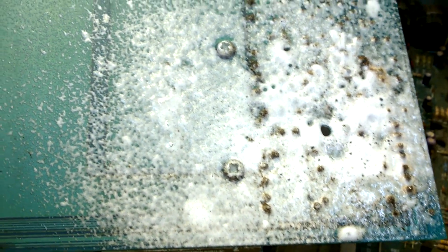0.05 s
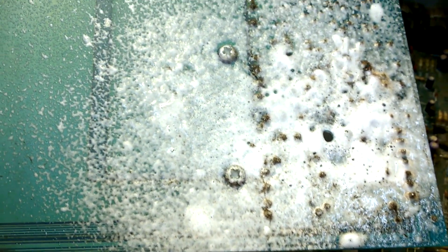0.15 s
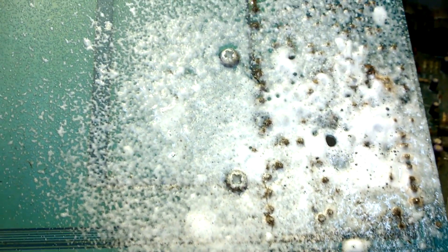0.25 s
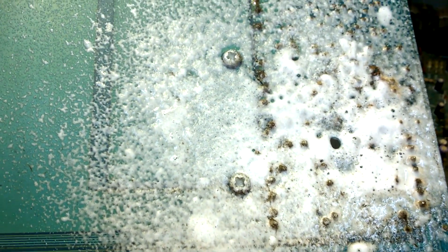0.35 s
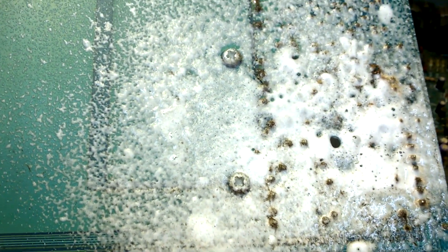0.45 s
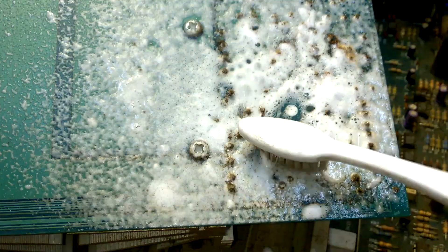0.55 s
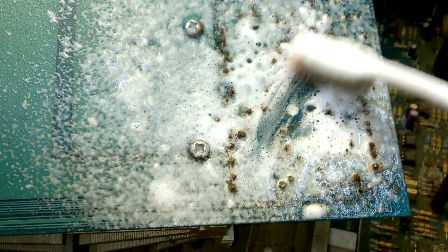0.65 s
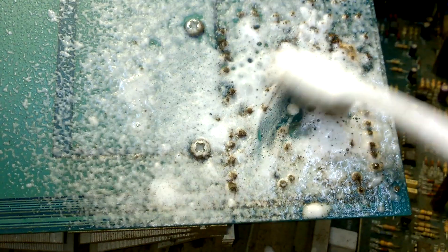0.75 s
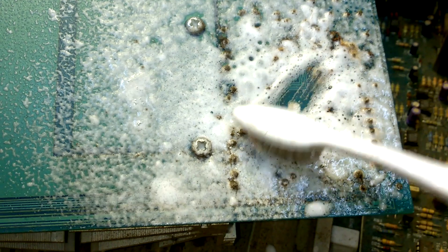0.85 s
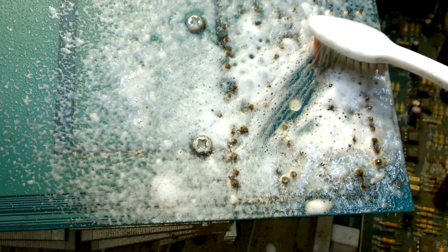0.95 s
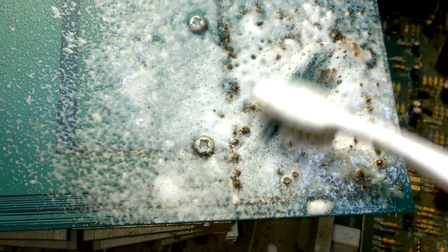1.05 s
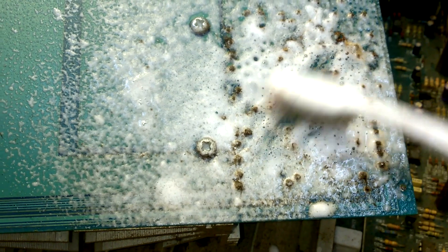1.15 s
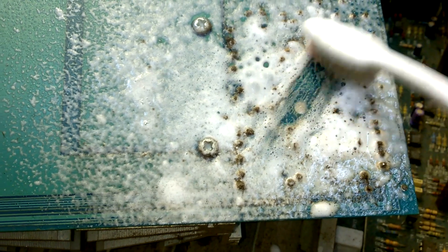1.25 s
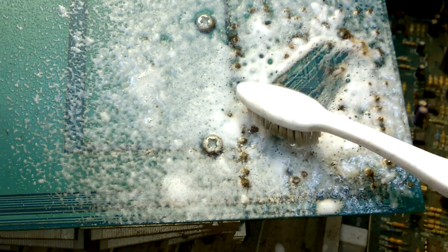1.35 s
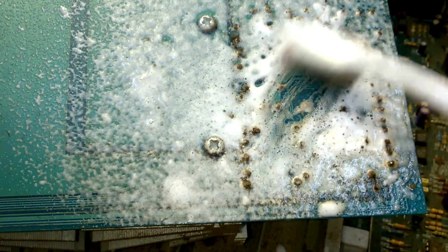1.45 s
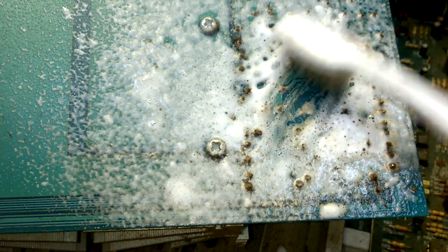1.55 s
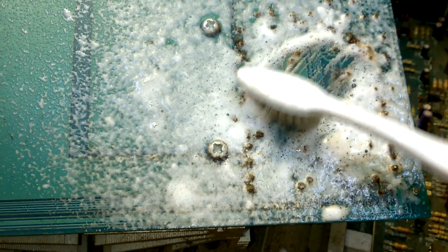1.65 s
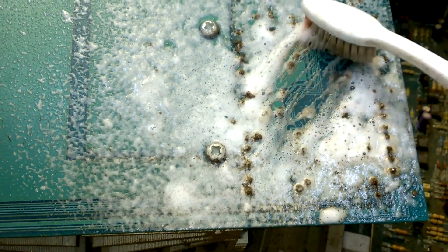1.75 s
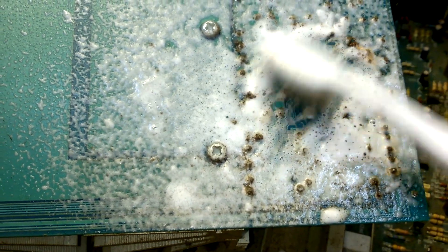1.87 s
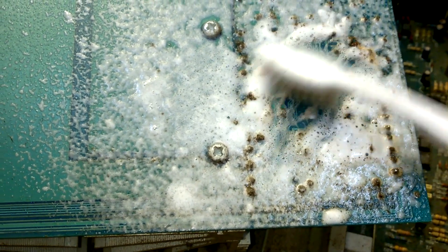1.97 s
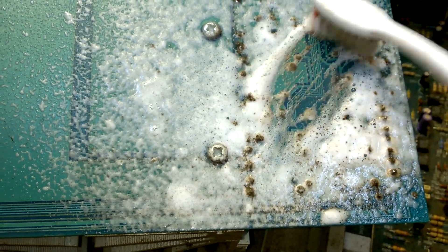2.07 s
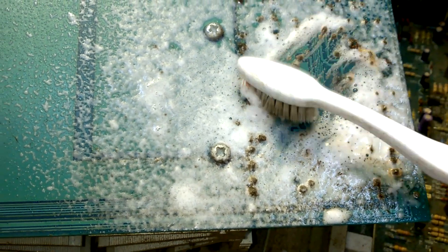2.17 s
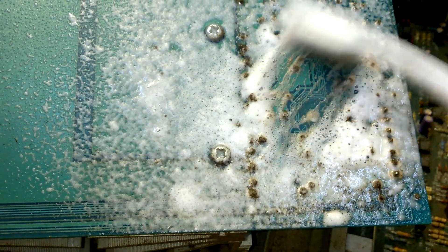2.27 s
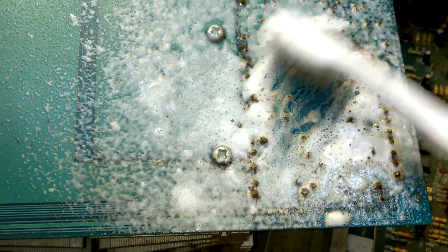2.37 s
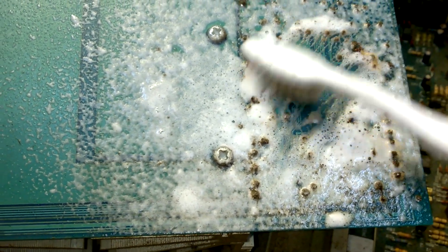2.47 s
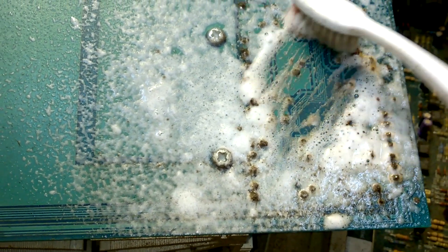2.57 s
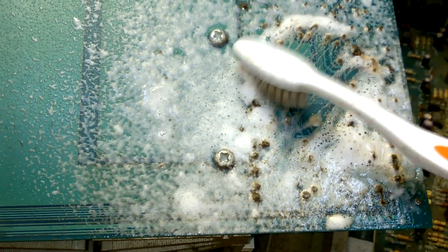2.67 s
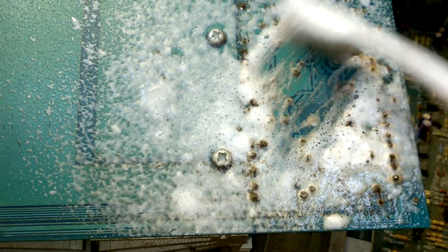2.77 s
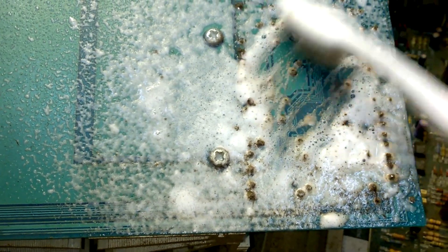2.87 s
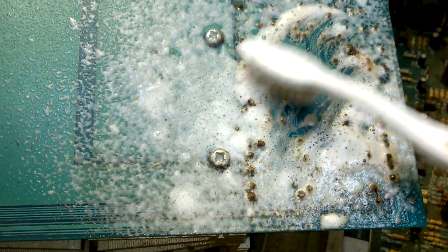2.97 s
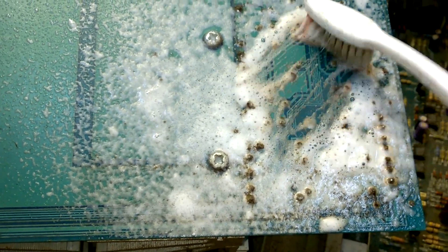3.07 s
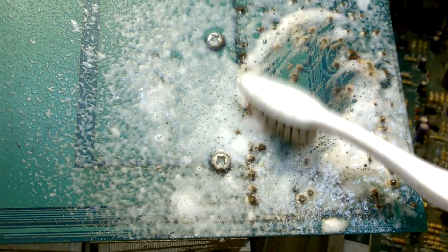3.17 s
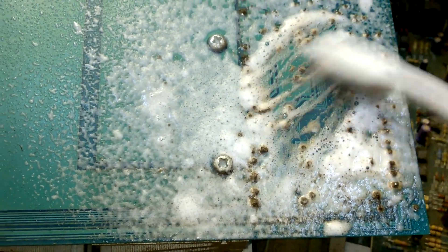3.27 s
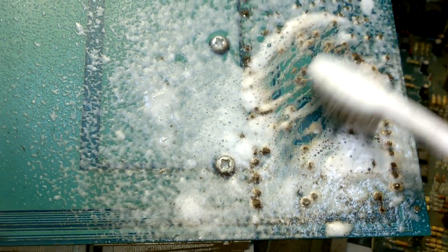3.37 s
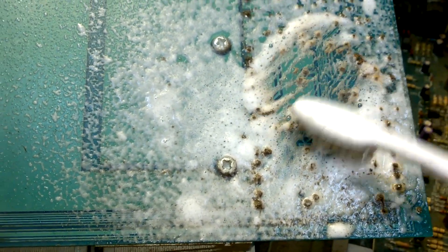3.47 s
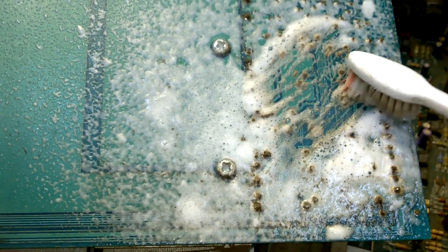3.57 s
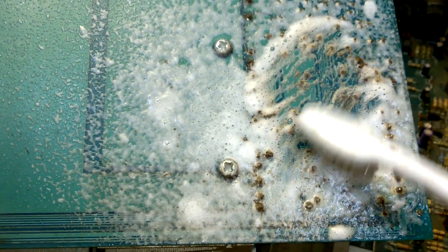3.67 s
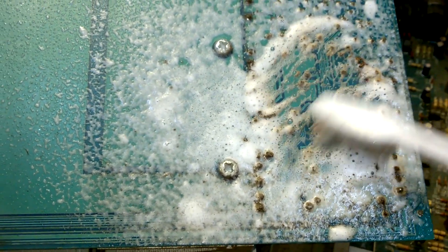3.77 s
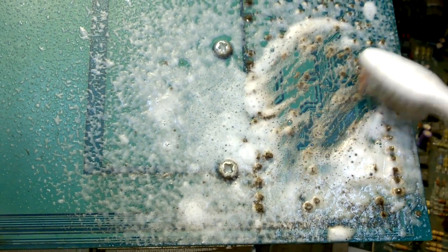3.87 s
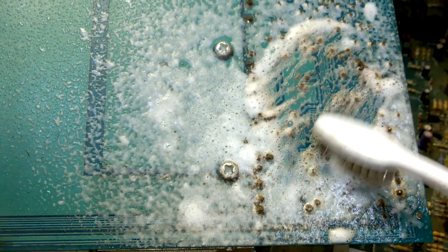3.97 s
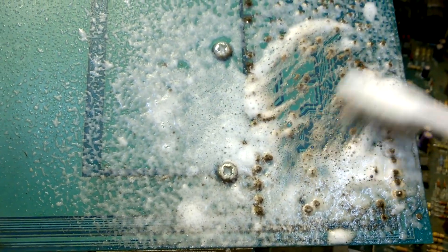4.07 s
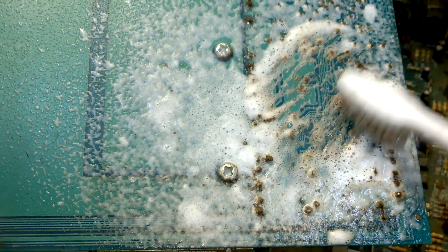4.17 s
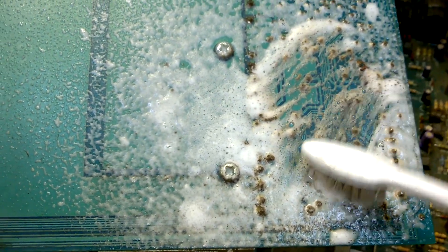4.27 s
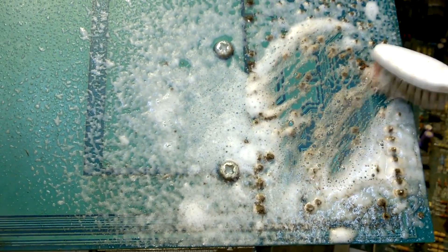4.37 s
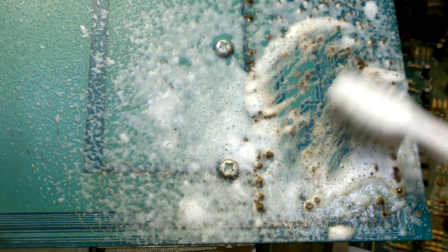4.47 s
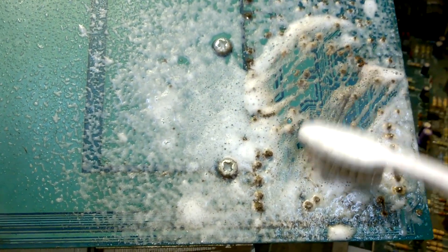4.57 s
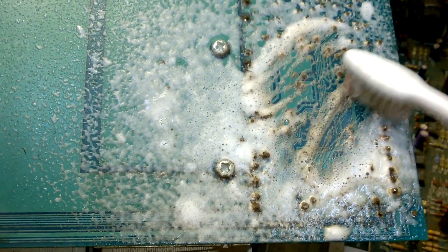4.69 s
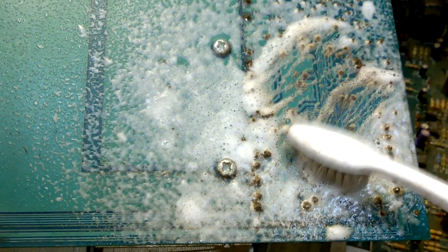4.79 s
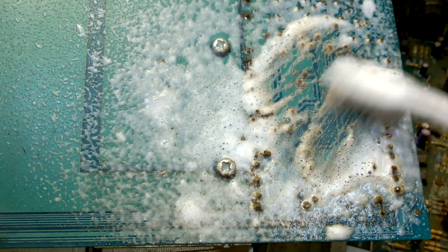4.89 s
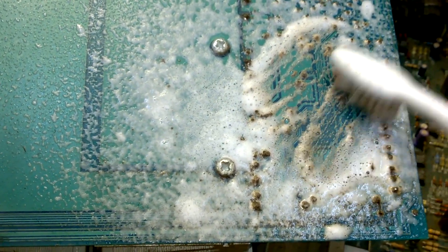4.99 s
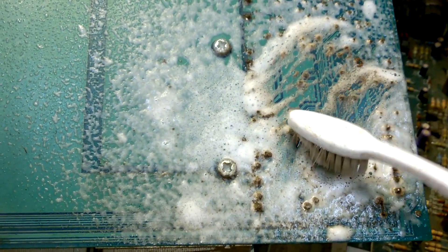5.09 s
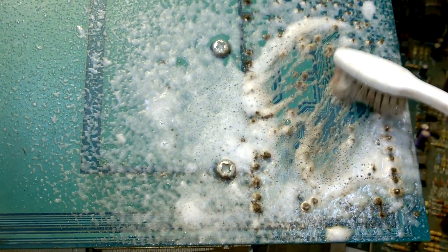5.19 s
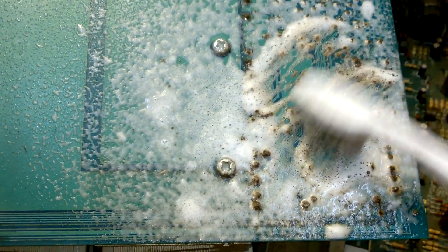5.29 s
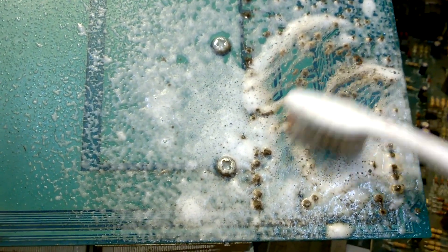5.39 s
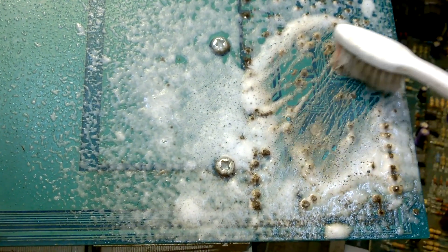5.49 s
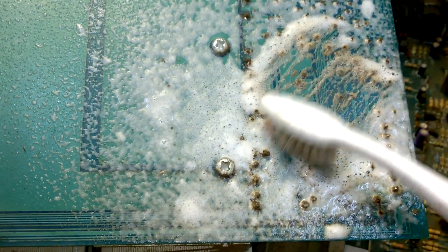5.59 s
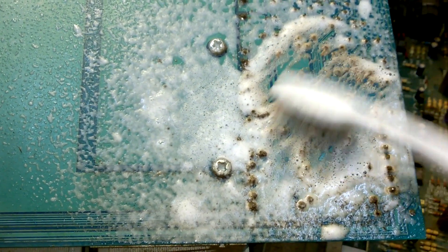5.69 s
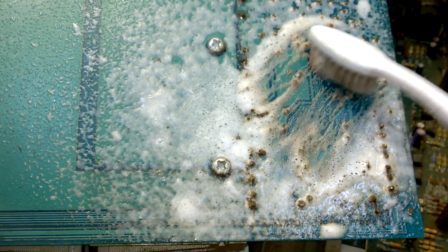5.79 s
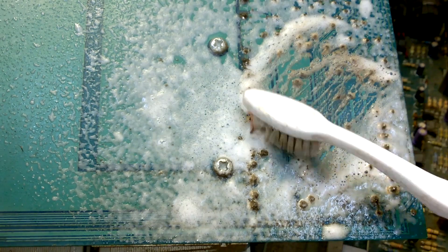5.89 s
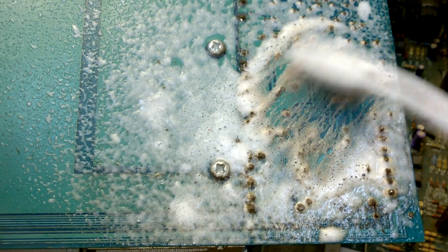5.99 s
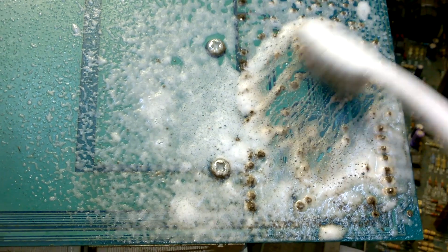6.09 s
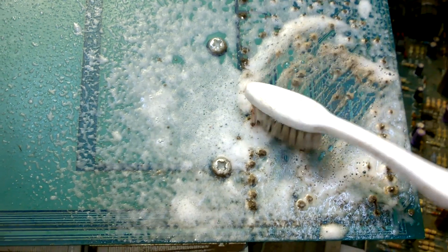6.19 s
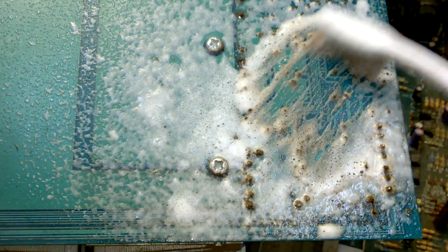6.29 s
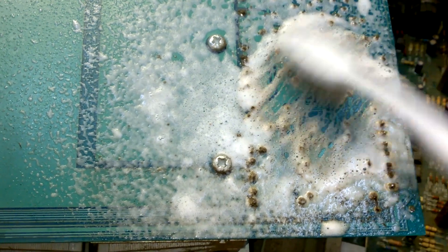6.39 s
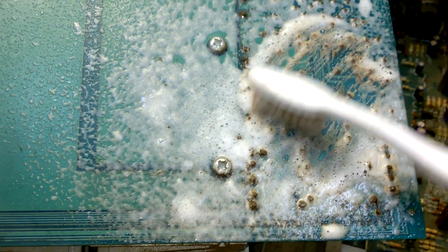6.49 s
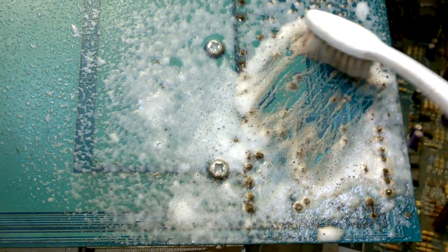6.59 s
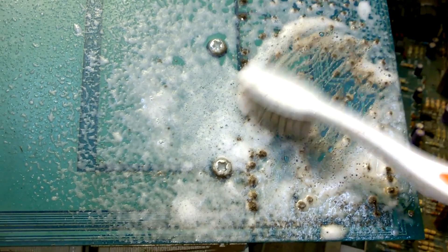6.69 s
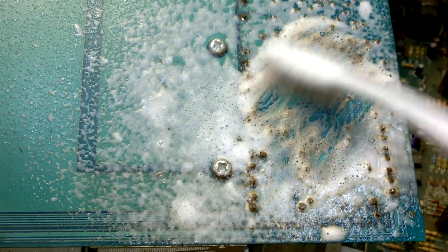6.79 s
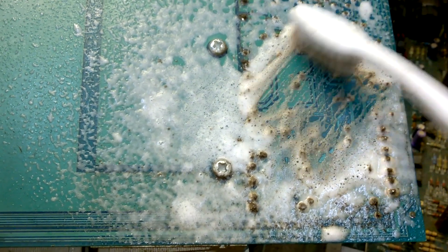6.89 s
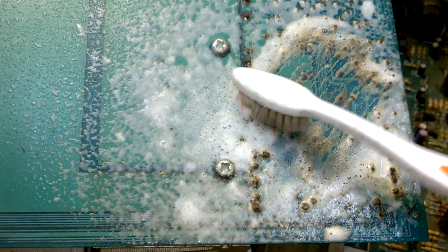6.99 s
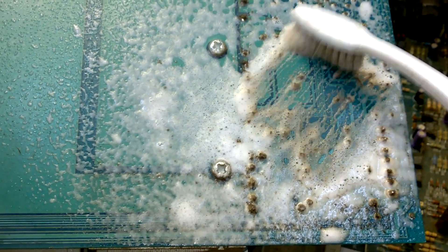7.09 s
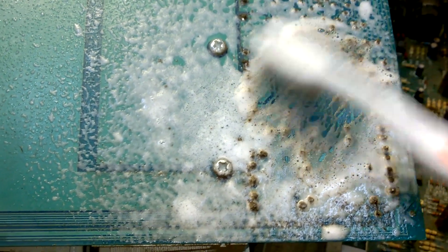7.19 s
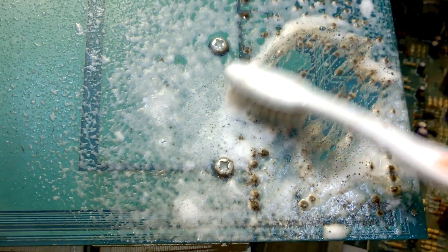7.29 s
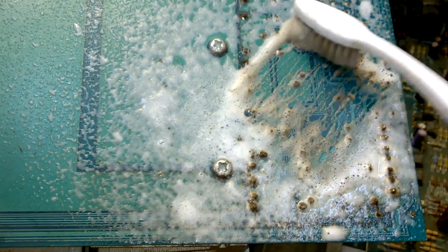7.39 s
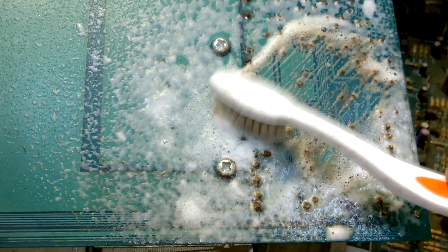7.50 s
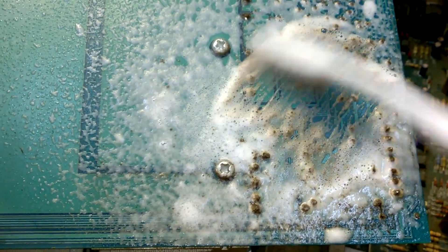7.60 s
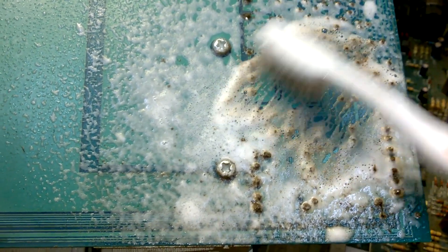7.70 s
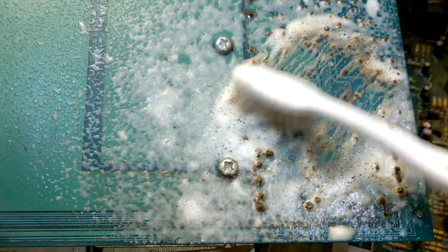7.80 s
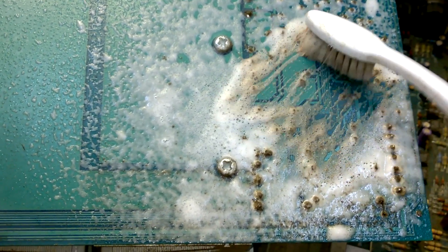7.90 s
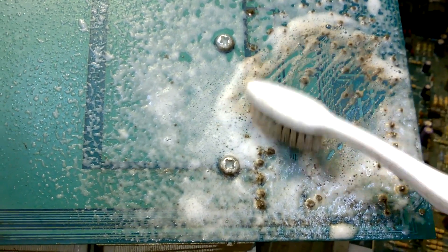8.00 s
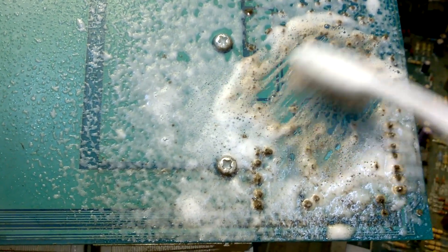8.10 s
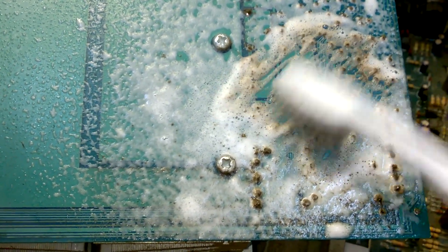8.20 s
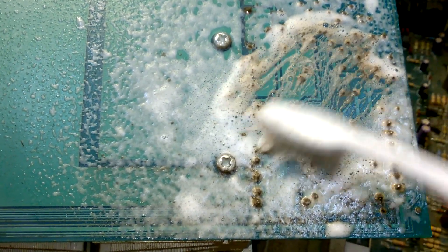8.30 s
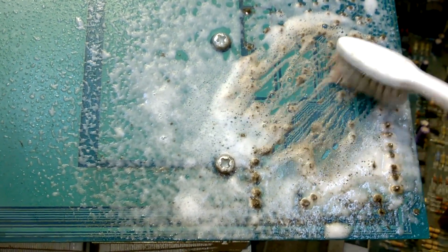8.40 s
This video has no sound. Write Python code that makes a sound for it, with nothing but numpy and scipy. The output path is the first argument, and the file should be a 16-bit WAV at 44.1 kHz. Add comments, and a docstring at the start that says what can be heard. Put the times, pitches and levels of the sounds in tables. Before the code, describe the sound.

A knock on a workbench, then a toothbrush scrubs a wet, foamy circuit board in quick, scratchy back-and-forth strokes.

```python
"""A faint tick, then a knock shakes a workbench, and a toothbrush scrubs a wet, foamy circuit board on it.
Stick-slip friction of the bristles makes dense clicks that drive the resonances of brush head and board.
Foam fizzes as its bubbles burst, tufts snap off solder pins, and now and then the board bumps the bench,
exciting its damped modes. A close pair of microphones hears it all in a quiet room."""
import sys
import numpy as np
from scipy import signal
from scipy.fft import rfft, irfft, next_fast_len
from scipy.io import wavfile
from scipy.ndimage import uniform_filter1d

SR = 44100
rng = np.random.default_rng(int(sys.argv[2]) if len(sys.argv) > 2 else 0)


def bounce(signal):
    """Save signal as a 16-bit WAV file at the path given by the first command-line argument."""
    frames = np.transpose(np.atleast_2d(signal))
    limited = np.clip(frames, -1, 1)
    pcm = np.round(limited * 32767).astype(np.int16)
    wavfile.write(sys.argv[1], SR, pcm)


N = 372644

# Strokes, pull and push in turn: (bite t/s, bearing down t/s, bite level/dB, lift level/dB,
# level at the turn before/dB, rise to the bite/(dB/s), extra ring of the head/dB)
BRUSH_STROKES = [(0.515, 0.03, -35, -40.5, -61.5, 3002, -1), (0.634, 0.041, -31.5, -39, -70, 800, 3),
                 (0.774, 0.064, -32.1, -37.5, -57, 448, 0.5), (0.907, 0.042, -34, -34, -61, 800, 1),
                 (1.045, 0.057, -28.5, -39.5, -49, 450, 3.5), (1.168, 0.046, -28.5, -35.5, -57, 800, 1.5),
                 (1.297, 0.056, -32, -34.5, -57.1, 600, -0.5), (1.443, 0.039, -32, -35, -64, 797, 1.5),
                 (1.578, 0.035, -29.5, -35, -54, 452, -0.5), (1.704, 0.041, -32.5, -31.5, -52, 600, 1),
                 (1.83, 0.054, -33.5, -29.5, -68, 800, 1.5), (1.969, 0.04, -35.2, -29, -51.9, 450, 1.5),
                 (2.09, 0.063, -30.5, -33.5, -57.0, 1111, -0.5),
                 (2.24, 0.028, -34.5, -30.5, -58, 450, -0.5), (2.345, 0.053, -31, -30, -57.3, 1103, 2.5),
                 (2.479, 0.048, -36.3, -33.5, -60, 450, 0.5), (2.619, 0.05, -26.5, -37.5, -57, 605, -1),
                 (2.739, 0.041, -36.5, -29.5, -51, 600, -1), (2.853, 0.057, -28, -31, -61, 798, 1.5),
                 (2.985, 0.039, -34.5, -30.5, -45, 450, 0), (3.101, 0.061, -28.5, -30, -58, 3200, 4),
                 (3.227, 0.058, -33.5, -35, -43.2, 1100, -0.5), (3.347, 0.066, -33, -31.5, -60, 2200, 1),
                 (3.495, 0.047, -31.5, -35.5, -41, 450, 3.5), (3.626, 0.066, -29.5, -33.5, -76, 1500, 1),
                 (3.767, 0.042, -32.0, -35.5, -48.5, 600, 2.5), (3.879, 0.094, -36, -33.5, -68, 1100, 1.5),
                 (4.049, 0.028, -35.2, -33, -49, 450, 2), (4.164, 0.067, -34.2, -30, -70, 800, 1),
                 (4.31, 0.046, -31.5, -34.8, -52.0, 600, 2.5), (4.439, 0.075, -31.5, -31.5, -65, 600, 1),
                 (4.593, 0.046, -31.5, -35.5, -46, 602, 1), (4.716, 0.075, -34, -28.5, -68, 799, 2),
                 (4.874, 0.038, -31.5, -30.5, -53, 600, 1.5), (5.019, 0.064, -29, -32.5, -67, 454, -1.5),
                 (5.155, 0.037, -32.5, -35, -46, 452, 1.5), (5.281, 0.051, -29.5, -31.2, -62, 600, 0.5),
                 (5.407, 0.046, -36.5, -31.8, -51, 800, 1.5), (5.56, 0.069, -27, -38.5, -51, 450, -1),
                 (5.702, 0.045, -32.5, -35.5, -46, 450, 0), (5.832, 0.045, -29.5, -30, -54.3, 600, -0.5),
                 (5.971, 0.045, -31.5, -34, -44, 809, 1), (6.108, 0.055, -28.5, -30, -67, 800, -0.5),
                 (6.243, 0.056, -34, -31, -47, 450, -1), (6.382, 0.061, -26.5, -32, -67, 800, 0),
                 (6.528, 0.037, -30, -33.5, -48, 600, -0.5), (6.641, 0.053, -29.2, -27.5, -63, 799, 1.5),
                 (6.791, 0.043, -32, -34, -53.4, 600, 0), (6.907, 0.053, -30.5, -29.5, -60, 800, 0.5),
                 (7.062, 0.029, -30.5, -30, -51, 452, 1), (7.185, 0.068, -26.5, -37.5, -62, 602, 0.5),
                 (7.312, 0.05, -34, -30.5, -53, 803, -0.5), (7.436, 0.061, -26, -32, -56.6, 1098, 1.5),
                 (7.562, 0.052, -35, -34.7, -46.5, 800, -3.5), (7.689, 0.054, -30, -32.5, -66, 1102, 2),
                 (7.809, 0.052, -36.5, -28.5, -42.5, 450, 0), (7.918, 0.057, -32, -27, -55, 3200, 2.5),
                 (8.064, 0.04, -33, -28.5, -41, 2204, 0), (8.188, 0.067, -27.5, -34, -60, 800, 0),
                 (8.304, 0.056, -36, -27.5, -50, 600, -1), (8.424, 0.032, -36, -27.5, -54.0, 1100, -2)]
# Timbre of a pull as the brush wanders: (t/s, board/dB, scrape/dB, foam/dB, upper board modes/dB)
PULL_TIMBRE = [(0.55, -8.5, -0.5, 13, 2), (1.05, -9, 0, 11, 1), (1.4, -12.5, -2, 4, 1.5),
               (1.7, -12, -6.5, 0, 0.5), (2.3, -10.5, -4, 1, 0), (3.0, -10.5, -6.5, -1, 1),
               (3.3, -6.5, -1, 5.5, 0), (3.9, -9, 1, 3.5, 2), (4.9, -12.5, 1.5, 2.5, 4.5),
               (5.5, -9.5, 0.5, 3.5, 1), (6.102, -10, -2, -1, 0), (6.9, -13, -0.5, 0.5, 2.5),
               (7.6, -13.5, -1.5, 0, 2.5), (8.3, -7, 0.5, 2, -0.5)]
# Tufts snapping off solder pins: (t/s, level/dB, crack relative to that level/dB)
TUFT_SNAPS = [(2.341, -26, -16), (7.915, -23, -21), (1.8639, -14, -4), (2.5214, -29, -9), (2.7624, -25, -5),
              (3.098, -35, -21), (3.1041, -13.5, -16), (3.106, -21, -13), (3.1185, -23, -15),
              (3.245, -21, -7), (3.3446, -20, -24), (3.349, -15.5, -21), (3.4407, -38, 4),
              (3.5388, -17.5, -21), (3.624, -34, -15), (3.6264, -27, -4), (3.6985, -28, -4),
              (4.0595, -23, -9), (4.4384, -35, -10), (4.878, -24, -10), (5.446, -23, -7), (5.627, -22, -12),
              (5.9711, -9.5, -8.5), (5.9844, -14, -8.5), (5.9918, -18, -2), (6.271, -15, -5),
              (6.51, -23, -5), (6.5292, -16, -15.5), (6.5636, -32, -18), (6.8055, -14, -7),
              (7.3731, -25, -14), (7.5522, -28, -14), (7.5619, -18.5, -14), (7.567, -22, -4),
              (7.8071, -35, -11), (7.8514, -21, -1), (8.064, -19, -17), (8.171, -21.5, -13.5),
              (8.2052, -19, -1)]
# Blows on the bench: (t/s, thud level/dB, clack level/dB, contact t/ms)
BLOWS = [(0.243, 3.5, -21.5, 1.26), (0.247, -10, -16, 0.72), (0.254, -13, -22.5, 0.75),
         (0.262, 4, -19.5, 1.37), (0.276, -12, -20.5, 1.8), (0.454, -17, -70, 2.6),
         (0.47, -11.5, -51, 1.37), (0.478, -15.5, -49, 1.63), (0.486, -27, -46, 1.8),
         (1.316, -34, -44, 3.4), (1.599, -40, -41, 1.5), (2.146, -26.5, -25, 1.7), (2.378, -30, -24, 1.9),
         (3.123, -33, -25, 1.7), (3.358, -35.5, -27.5, 1.2), (3.896, -26, -45, 3.1),
         (4.441, -33.5, -42, 1.1), (4.992, -38, -38, 1.6), (5.281, -41, -52, 1.8), (6.415, -18, -30, 4.5),
         (7.983, -31, -22.5, 1.1), (8.211, -37, -37, 1)]
# Modes of the bench: (f/Hz, level/dB, 60 dB decay t/s)
BENCH_MODES = [(72, -12, 0.49), (100.3, -10, 0.14), (123, -16, 0.51), (160, -26, 0.34), (172, -28, 0.21),
               (228, -2, 0.18), (261, -11.5, 0.12), (294, 0.5, 0.062), (378, -4, 0.063), (401, -12, 0.11),
               (558, -5.5, 0.1), (639, -10, 0.077), (685, -8.5, 0.07), (754, -9.5, 0.069), (808, -10, 0.16),
               (884, -13, 0.22), (984, -6, 0.035), (1120, -6, 0.04), (1330, -18, 0.049)]
# Resonances of board, scrape, brush head, snapped pin and clack: (f/Hz, bandwidth/Hz, level/dB)
BOARD_MODES = [(80, 22, -10), (129.1, 9.9, -4.5), (254.3, 3.9, -7), (313.3, 7.5, -10), (432.3, 11.5, 1.5),
               (482, 23, -4.5), (518.1, 9.6, 4.5), (583, 50, -5.5), (731.4, 14.8, -10), (891, 37, -8),
               (965, 7.2, -6.5), (1011.5, 8.4, -0.5), (1076, 14.5, -6), (1168, 36, -6.5),
               (1264, 13.5, -7.5), (1328, 89, -9.5)]
SCRAPE_MODES = [(1649, 74, -4.5), (1767, 23, 0), (1920, 118, -3.5), (2105, 152, -1), (2614, 383, 1.5),
                (3065, 420, 2.5), (3675, 315, 0)]
HEAD_MODES = [(3861, 99, -1), (4060, 208, 4), (4443, 910, -4)]
PIN_MODES = [(2650, 650, -3), (4000, 600, 0)]
CLACK_MODES = [(1700, 250, 2.5), (1250, 630, 0.5), (4800, 5300, -12.5)]
# Spectral densities of the fizz and of the background: (f/Hz, relative level/dB)
FOAM_SPECTRUM = [(2000, -20.5), (4300, -20), (5000, -4), (5800, 0), (7000, -3), (7700, -6), (9000, -6.5),
                 (10500, -9), (12300, -7), (14000, -7), (15000, -5.5), (16000, -11)]
AIR_SPECTRUM = [(15, -28), (25, -2), (70, 1), (326, -25), (863, -28.5), (1520, -31), (1840, -28.5),
                (4740, -33), (5280, -32.5), (16000, -43)]

PUSH_DB = (-7.5, 2.3, -1.5, 4)  # a push changes board, scrape, foam and upper board modes
PUSH_THINS_DB = -1.5  # a push drives the deepest scrape resonances less
FALL_DB_PER_S = (679, 806)  # lift of a pull, of a push
CUT_S, CUT_DB_PER_S = 0.511, 900  # the knock's ring cuts off abruptly just before the scrubbing starts
EARLY_CLACK_DB = -9.5  # the first clack resonance is weaker before the scrubbing
TIME = np.arange(N) / SR


def brush(clack):
    """Stick-slip friction: bristle slips follow the stroke, drive head and board, and stir the foam."""
    stroke_db, head_db, push = strokes()
    times, *timbre = np.transpose(PULL_TIMBRE)
    board_db, scrape_db, foam_db, upper_db = (
        np.interp(TIME, times, db) + change_db * push for db, change_db in zip(timbre, PUSH_DB))
    # head, scrape and foam share the stroke level, adding in power
    total = np.sqrt(undb(head_db) ** 2 + undb(scrape_db) ** 2 + undb(foam_db) ** 2)
    envelope = undb(stroke_db + 1.52 * flicker(120)) / total
    slips, bubbles = clicks(9000, spread_db=1.1), clicks(9000, spread_db=2.9)
    head = level(resonate(pair(slips, 0.7, 2.94), HEAD_MODES), 0.056) * undb(head_db)
    wet_slips = pair(slips + 0.78 * bubbles, 0.84, 2.1)
    scrape = resonate_split(wet_slips, SCRAPE_MODES, PUSH_THINS_DB * push, 0, count=4)
    scrape = level(scrape, 1.48) * undb(scrape_db)
    fizz = colour(pair(0.96 * slips + bubbles, 0.21, -2.0), FOAM_SPECTRUM)
    foam = level(fizz, 2.4) * undb(foam_db)
    # slips and clacks force the board, which rings on after each lift
    drive = pair(slips, 0.86, 2.9) * undb(stroke_db + board_db + 21.0 + 2.4 * flicker(40))
    board = resonate_split(drive + undb(16) * clack, BOARD_MODES, 0, upper_db, count=8)
    return envelope * (head + scrape + foam) + board


def strokes():
    """Amplitude envelope of bite, bearing down and lift: level/dB, head ring/dB, and 1 during a push."""
    bite, hold, bite_db, lift_db, turn_db, rise, head_db = np.transpose(BRUSH_STROKES)[:, :, None]
    t = np.arange(N // 40 + 2) * 40 / SR
    fall = np.resize(FALL_DB_PER_S, len(BRUSH_STROKES))[:, None]
    bearing_db = bite_db + (lift_db - bite_db) * np.clip((t - bite) / hold, 0, 1)
    each_db = bearing_db - rise * np.maximum(bite - t, 0) - fall * np.maximum(t - bite - hold, 0)
    # the bristles never quite leave the board where the brush turns
    turns = (bite[1:, 0] + (bite + hold)[:-1, 0]) / 2
    db = np.maximum(each_db.max(axis=0), np.interp(t, turns, turn_db[1:, 0]))
    db[t < bite[0]] = -120
    stroke = np.searchsorted(turns, TIME)
    ring_db, push = uniform_filter1d([head_db[stroke, 0], stroke % 2], SR // 50)
    return np.interp(TIME, t, db), ring_db, push


def snaps():
    """Impulse excitation: a tuft's sudden release rings pin and head and cracks in the treble."""
    ring, crack = np.zeros((2, N))
    for start, db, treble_db in TUFT_SNAPS:
        ring[int(start * SR)] += undb(db)
        crack[int(start * SR)] += undb(db + treble_db)
    snap = undb(22) * resonate(ring, PIN_MODES) + undb(10) * resonate(crack, [(12900, 15000, 0)])
    return room(snap, wet_db=-4.5, t60=0.0084)


def bench_thuds():
    """Modal superposition: blows ring the bench, duller for a longer contact; loose things rattle on."""
    force = np.zeros((2, N + SR))  # rows: blows before and after CUT_S
    t = np.arange(SR) / SR
    noise = rng.standard_normal((len(BLOWS), SR // 2))
    for (start, db, _, contact_ms), rattle in zip(BLOWS, noise):
        i, row = int(start * SR), int(start > CUT_S)
        phase = t[:SR // 100] * 1000 / contact_ms
        pulse = (phase < 1) * np.sin(np.pi * phase) ** 2 / np.sum(phase < .5)
        force[row, i:i + SR // 100] += undb(db) * pulse
        force[row, i:i + SR // 2] += undb(db - 38.5) * uniform_filter1d(rattle, 50) * fade(0.37, .5)
    ring = sum((-1) ** k * undb(db) * np.sin(2 * np.pi * hz * t) * fade(t60, 1)
               for k, (hz, db, t60) in enumerate(BENCH_MODES))
    knock, bumps = signal.oaconvolve(force, ring[None], axes=1)[:, :N]
    cut = undb(-CUT_DB_PER_S * np.maximum(TIME - CUT_S, 0))
    return undb(-10) * room(knock * cut + bumps, wet_db=-15, t60=0.02)


def clack_bursts():
    """Impact noise: at each blow the board claps on the bench in a burst of grit."""
    bursts, noise = np.zeros(N + SR), rng.standard_normal((len(BLOWS), SR // 4))
    for (start, _, db, _), grit in zip(BLOWS, noise):
        i = int(start * SR)
        bursts[i:i + SR // 4] += undb(db) * grit * fade(0.037, .25)
    return bursts[:N]


def clack_ring(clack):
    """Forced vibration: the board's claps drive broad resonances that echo in the room."""
    first_db = EARLY_CLACK_DB * (TIME < CUT_S)
    ring = resonate_split(clack, CLACK_MODES, first_db, 0, count=1)
    return room(undb(6.5) * ring, wet_db=0.5, t60=0.18)


def foam_pops():
    """A Poisson process: once the brush has stirred the foam, scattered bubbles burst."""
    bursts = pair(clicks(150, spread_db=10.5), 0.26, -1.0) * (TIME > BRUSH_STROKES[0][0])
    return level(resonate(bursts, [(4040, 6700, 12), (11000, 8300, -14)]), -66.5)


def tick(start_s=0.095):
    """Band-limited noise in exponential decay: a faint tick that dies away as a high hiss."""
    burst, i = np.zeros((2, N)), int(start_s * SR)
    burst[:, i:i + SR // 5] = undb(-41.5) * rng.standard_normal((2, SR // 5)) * fade(0.18, .2)
    return resonate(burst, [(5870, 1140, 3.5), (3500, 1800, -3)])


def air():
    """Stationary noise: room rumble and microphone hiss, most alike left and right in the bass."""
    mid, side = colour(rng.standard_normal((2, N)), AIR_SPECTRUM)
    side = colour(side, [(200, -5.0), (900, 3.5)])
    return level(np.array([mid + side, mid - side]), -57.5)


def room(x, wet_db, t60):
    """Reverberation: direct sound plus decaying echoes that differ at each microphone."""
    echo = rng.standard_normal((2, SR // 5)) * fade(t60, .2)
    echo *= undb(wet_db) / np.sqrt(np.sum(echo ** 2, axis=1, keepdims=True))
    return x + signal.oaconvolve(x * np.ones((2, 1)), echo, axes=1)[:, :N]


def pair(x, alike, pan_db):
    """Partial coherence: two microphones share a fraction of a wide source's power."""
    return (np.sqrt(alike) * x[0] + np.sqrt(1 - alike) * x[1:]) * undb([[pan_db / 2], [-pan_db / 2]])


def clicks(per_s, spread_db):
    """Shot noise: random impulses of uneven size; rows: shared, left only, right only."""
    size = undb(spread_db * np.minimum(rng.exponential(size=N), 4))
    return level((rng.random(N) < per_s / SR) * size * rng.standard_normal((3, N)), 0)


def flicker(per_s):
    """Random modulation: values joined by straight ramps, with a spread near 1."""
    step = int(SR / per_s)
    held = np.repeat(rng.standard_normal(N // step + 1), step)
    return 1.09 * uniform_filter1d(held, step)[:N]


def resonate(x, modes):
    """Resonance: second-order band-passes summed with alternating sign."""
    return through(x, lambda f: sum((-1) ** k * undb(db) / (1 + 1j * (f - hz * hz / f) / width)
                                    for k, (hz, width, db) in enumerate(modes)))


def resonate_split(x, modes, first_db, rest_db, count):
    """Superposition: the first count modes and the rest are driven with separate strengths."""
    return resonate(x * undb(first_db), modes[:count]) + resonate(x * undb(rest_db), modes[count:])


def colour(x, points):
    """Spectral shaping by (f/Hz, level/dB) points joined over log frequency."""
    hz, db = np.transpose(points)
    return through(x, lambda f: undb(np.interp(np.log(f), np.log(hz), db)))


def through(x, response):
    """Linear filtering: the spectrum is multiplied by a frequency response."""
    size = next_fast_len(N + SR // 4)
    hz = np.fft.rfftfreq(size, 1 / SR) + 1
    return irfft(rfft(x, size) * response(hz), size)[..., :N]


def fade(t60, length_s):
    """Exponential decay of 60 dB in t60 seconds."""
    return undb(-60 * np.arange(int(length_s * SR)) / SR / t60)


def level(x, db):
    """Normalisation to an rms level."""
    return x * undb(db) / np.sqrt(np.mean(x ** 2))


def undb(db):
    """Amplitude ratio of a level in decibels."""
    return 10 ** (np.asarray(db) / 20)


def scene():
    """Superposition of all sources at the two microphones."""
    clack = clack_bursts()
    close = room(brush(clack) + snaps() + tick() + foam_pops(), wet_db=-24.5, t60=0.13)
    return close + bench_thuds() + clack_ring(clack) + air()


def record(dry):
    """Band limiting: the recorder's steep low-pass cuts off above 15.7 kHz."""
    return signal.sosfilt(signal.ellip(10, .2, 70, 15700, fs=SR, output="sos"), dry)


dry = scene()
out = record(dry)
bounce(out)
```